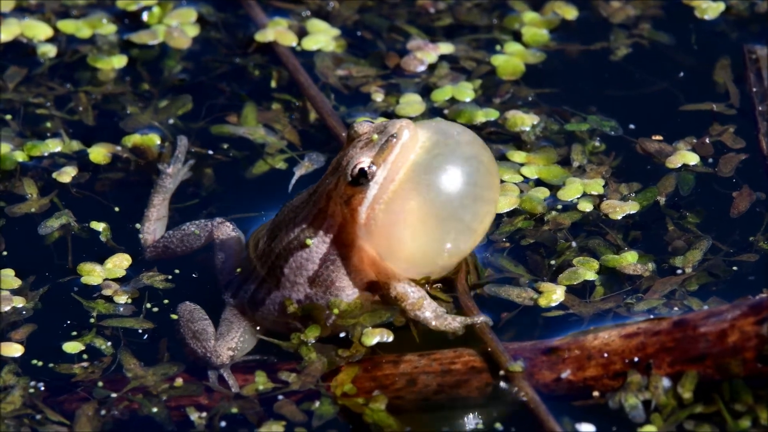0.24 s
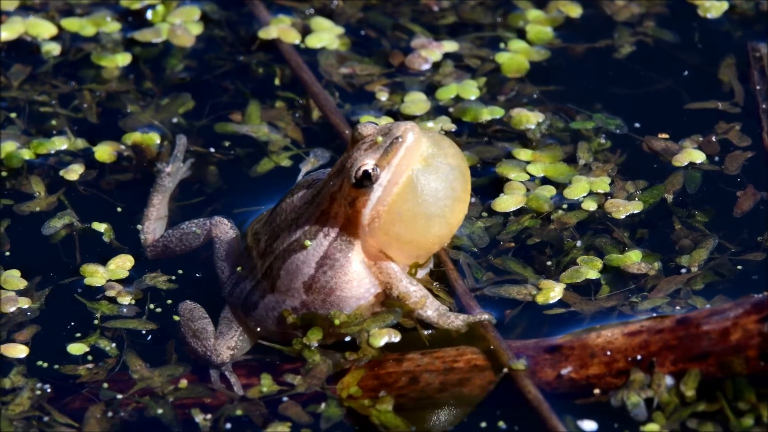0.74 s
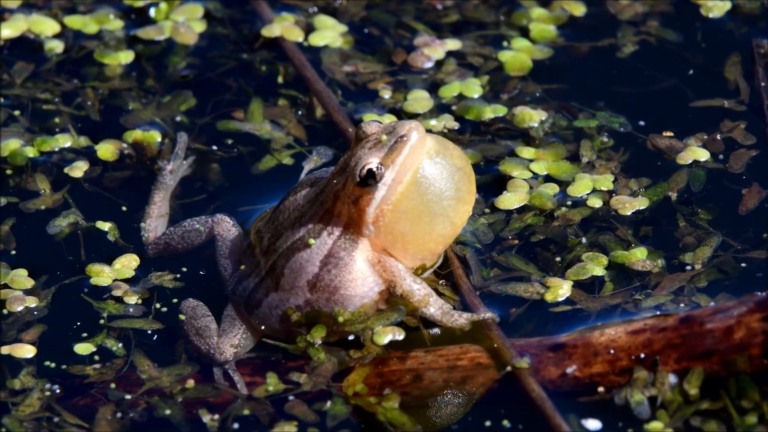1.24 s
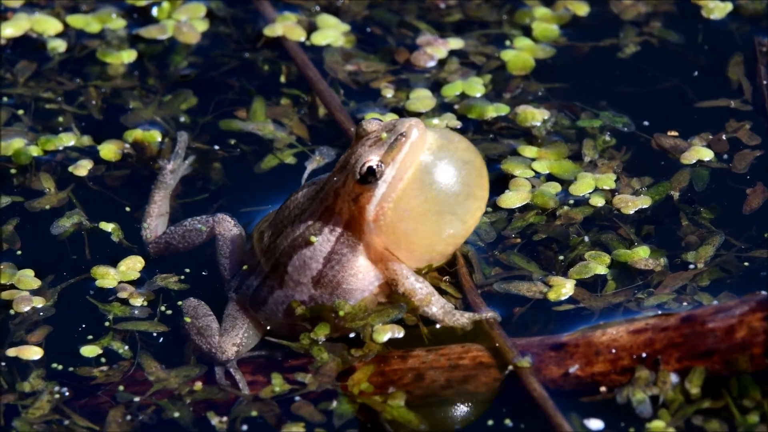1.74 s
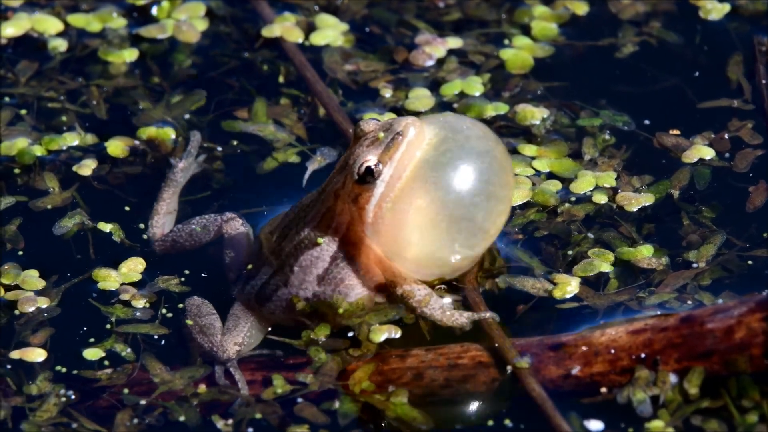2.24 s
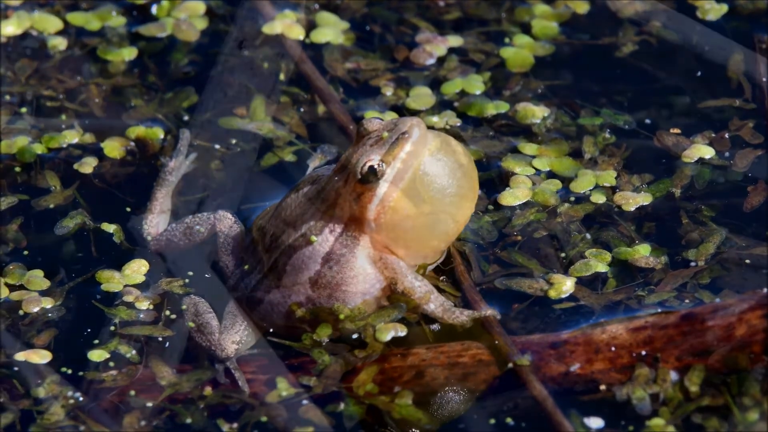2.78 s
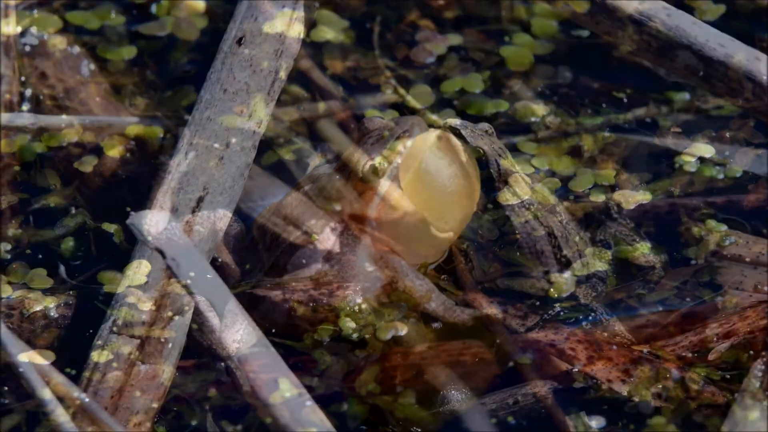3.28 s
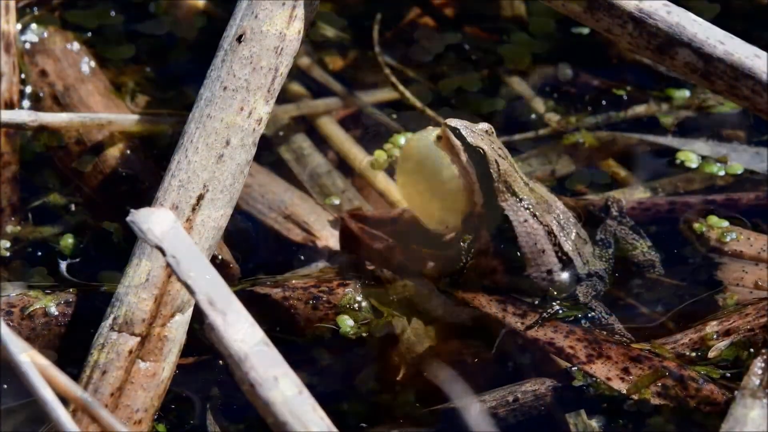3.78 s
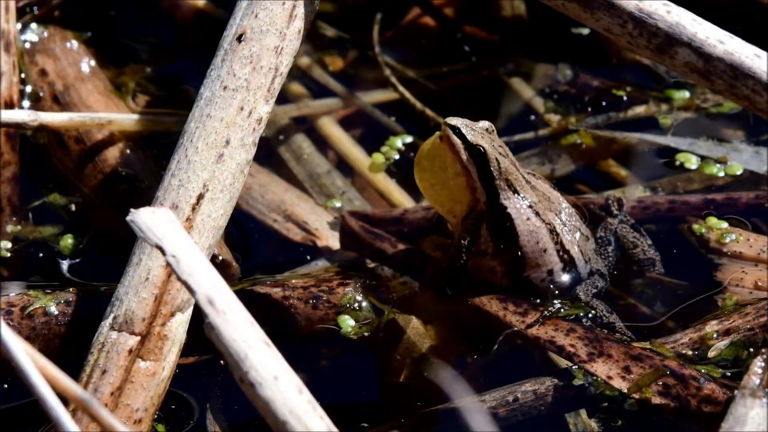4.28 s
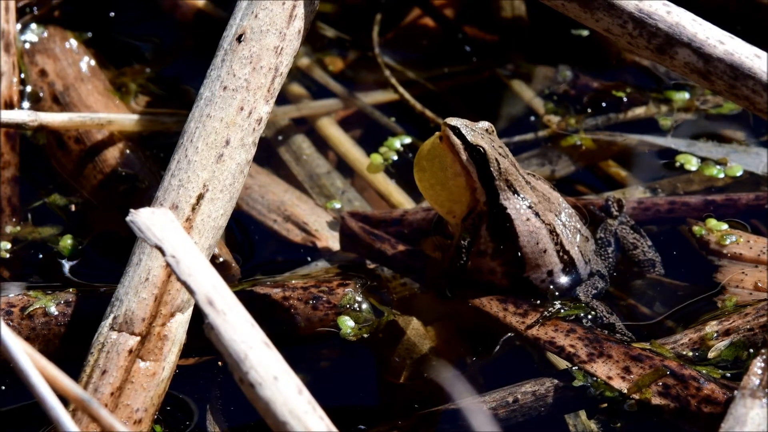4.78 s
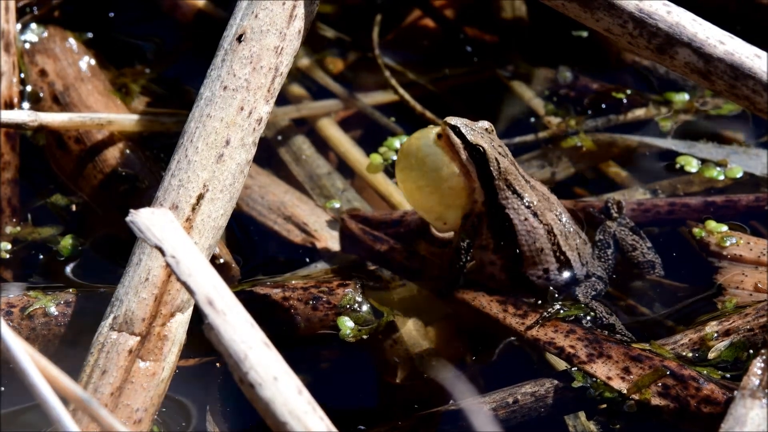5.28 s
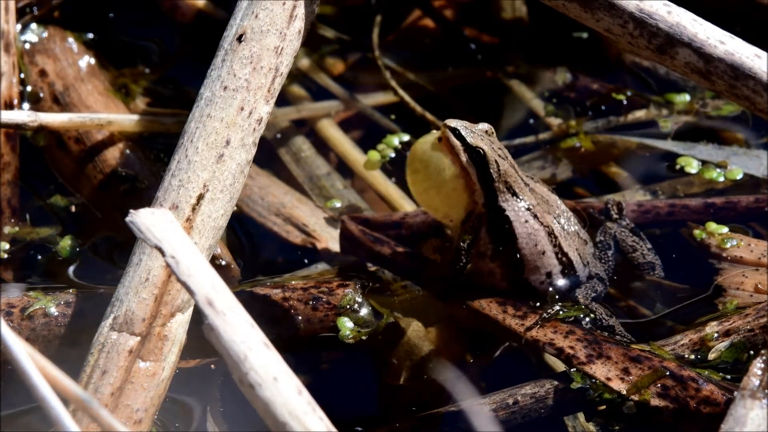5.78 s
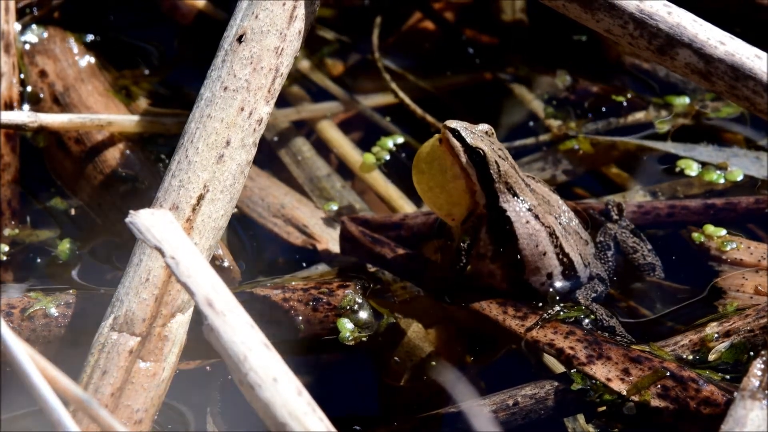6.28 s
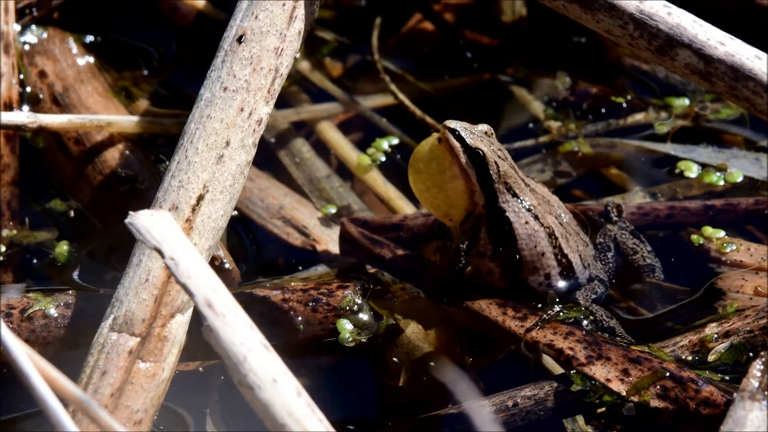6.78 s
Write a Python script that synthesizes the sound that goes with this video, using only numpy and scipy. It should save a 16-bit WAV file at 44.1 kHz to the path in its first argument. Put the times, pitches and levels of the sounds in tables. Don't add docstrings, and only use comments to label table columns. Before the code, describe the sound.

From 0 s a loud chorus of small frogs is already going at a shallow, reedy pond, and it continues unbroken to about 7 s. Each call lasts roughly 0.1 to 0.65 s: a string of hard, ringing ticks around 3 to 4 kHz, quick at first, then slower, longer and higher, like a comb being stroked. Near callers overlap on the left, ahead and on the right, with stray sharp ticks between. A smaller frog adds faint higher ticks near 0.5 and 2.4 s. Farther frogs form a blurred bed that dips around 2.4 s, swells from 2.75 to 4 s, thins, swells again near 5.3 s and drops near 5.9 s. The busiest, loudest clatter comes around 3.2 to 4.2 s. Reeds give short diffuse echoes. Far beneath are low rumble, soft wind puffs, thin hiss and a barely noticeable engine hum near 3.75 s. Peaks sound slightly compressed.

```python
import sys
import numpy as np
from scipy import signal
from scipy.fft import rfft, irfft, next_fast_len
from scipy.io import wavfile
from scipy.ndimage import uniform_filter1d, minimum_filter1d, map_coordinates

SR = 44100
rng = np.random.default_rng(int(sys.argv[2]) if len(sys.argv) > 2 else 0)


def store_pcm(level_fs):
    pcm = np.round(np.clip(level_fs, -1, 1) * 32767).astype(np.int16)
    wavfile.write(sys.argv[1], SR, np.atleast_2d(pcm).T)


def voltage_ratio(level):
    return 10 ** (np.asarray(level, float) / 20)


N = 310002


def unit(x):
    return x / np.sqrt(np.mean(x ** 2) + 1e-20)


def filtered(x, response):
    m = next_fast_len(N + SR // 2)
    spectrum = rfft(x, m) * response(np.fft.rfftfreq(m, 1 / SR))
    return irfft(spectrum, m)[..., :N]


def colour(points):
    f, db = np.transpose(points)
    return lambda hz: voltage_ratio(np.interp(np.log(hz + 1), np.log(f), db))


def curves(rows):
    s, *columns = np.transpose(rows)
    return [np.interp(np.arange(N) / SR, s, column) for column in columns]


def rush(spectrum, alike):
    mid, side = filtered(rng.standard_normal((2, N)), colour(spectrum))
    turn = np.arccos(np.clip(alike, 0, 1)) / 2
    return unit(np.cos(turn) * mid + np.sin(turn) * side * [[1], [-1]])


def place(shapes, s):
    first = np.clip(np.round((s - .0005) * SR).astype(int), 0, N)
    at = (first[:, None] + np.arange(shapes.shape[2])).ravel()
    return np.array([np.bincount(at, side.ravel(), N + SR)[:N] for side in shapes])


def trill(s, length, gap_ms, db, hz, side_db, ring_share):
    slowing_ms = 2.5
    shortest_gap_ms = 13.15
    rise_hz_per_tick = 42.6
    soft_start_db, swell_ticks, tiring_db = 4.5, 2.7, 3.5
    b = gap_ms - slowing_ms / 2
    gaps = max(2, round((np.sqrt(b * b + 2000 * slowing_ms * length) - b) / slowing_ms))
    slowing = 2 * (1000 * length - gaps * gap_ms) / (gaps * (gaps - 1))
    k = np.arange(gaps + 1)
    t = (k * gap_ms + slowing * k * (k - 1) / 2) / 1000
    gap_around_ms = gap_ms + slowing * (k - .5)
    ring_ms = np.maximum(3.2, ring_share * (gap_around_ms - shortest_gap_ms))
    level = db - soft_start_db * np.exp(-k / swell_ticks) - tiring_db * (k / gaps) ** 4
    pitch = hz + rise_hz_per_tick * (k - gaps / 2)
    return np.c_[s + t, level, pitch, ring_ms, side_db + 0 * t]


def voices(ticks, snap_db, scatter_db, path_us, rise_ms, throat_db):
    # (multiple of the sac pitch, level [dB], extra fall [dB per ms])
    partials = [(.45, -17, 5.5), (.51, -15, 4), (1, -0.5, 0.59), (1.5, -20, 2), (1.62, -20, 4),
                (2, -32, 1.5), (2.5, -42.5, 1.5), (3, -40.5, 2.5)]
    # (frequency [Hz], level [dB])
    snap_colour = [(600, -36.5), (1500, -16.5), (2400, -35), (3500, 10), (7000, -14), (15000, -24)]
    sag, sag_ms = 0.05, 0.92
    s, db, hz, ms, side_db = np.transpose(ticks)[:, :, None]
    luck = rng.standard_normal((len(ticks), 12))
    left_right = np.array([1, -1])[:, None, None]
    t = np.arange(800) / SR

    rise = rise_ms * voltage_ratio(-db / 2)
    opening = np.sin(np.minimum(1000 * t / rise, 1) * np.pi / 2) ** 2
    shut = np.clip((1.48 * ms - 1000 * t) / (0.57 * ms), 0, 1)
    gate = opening * np.sin(shut * np.pi / 2) ** 2

    ears = t + 1e-6 * (12 + path_us * luck[:, :1]) * left_right
    settling = sag * sag_ms / 1000 * np.exp(-1000 * t / sag_ms)
    turns = hz * (ears - settling) * (1 + 0.0034 * luck[:, 1:2])

    small_db = 6.5 * np.maximum(0, hz / 3700 - 1) * 10
    ring = 0
    for i, (k, level, fall) in enumerate(partials):
        if k < 1:
            level = level + throat_db + small_db
            fall = fall * (1 - 0.082 * throat_db)
        uneven_db = scatter_db * abs(np.log2(k)) * luck[:, 2 + i:3 + i]
        strength = voltage_ratio(level - fall * 1000 * t + uneven_db)
        ring = ring + strength * np.sin(2 * np.pi * k * turns + i * luck[:, 10:11])

    size = voltage_ratio(db + side_db / 2 * left_right)
    snap = rng.standard_normal((len(ticks), len(t))) + 1.13 * rng.standard_normal(ring.shape)
    snap = size * voltage_ratio(snap_db + 0.4 * luck[:, 11:] - 60 * t / 0.0053) * snap

    small_body = lambda f: 1 / (1 + (950 / (f + 1)) ** 6)
    rings = filtered(place(size * gate * ring, s[:, 0]), small_body)
    return rings + filtered(place(snap, s[:, 0]), colour(snap_colour))


def near_frogs():
    # (first tick [s], length [s], first gap [ms], peak level [dB], mean pitch [Hz])
    left_trills = [(0.5171, 0.3681, 35.4, -9.8, 3465), (0.5729, 0.2255, 37.8, -10.3, 3445),
                   (0.9738, 0.2893, 38.97, -5.1, 3525), (1.4143, 0.3058, 28.46, -8.8, 3445),
                   (1.5993, 0.2443, 46.7, -5.4, 3485), (1.8843, 0.2387, 31.77, -11.6, 3515),
                   (2.1098, 0.3445, 56.28, -9.3, 3625), (2.2207, 0.5951, 35.49, -14.2, 3305),
                   (2.4147, 0.2763, 23.82, -7.1, 3355), (3.4012, 0.1543, 34.0, -6.3, 3015),
                   (4.1715, 0.6004, 28.04, -3.4, 3145), (5.1302, 0.4205, 43.12, -8.5, 3415),
                   (5.6459, 0.3563, 32.33, -7.3, 3245), (5.9224, 0.6556, 27.2, -3.2, 3185),
                   (5.928, 0.4413, 30.55, -4.8, 3315), (6.2569, 0.3378, 41.21, -10.5, 3435),
                   (6.4626, 0.2594, 26.6, -5.7, 3275)]
    middle_trills = [(0.1097, 0.4459, 27.35, -4.2, 3215), (0.807, 0.4396, 33.2, -10.2, 3325),
                     (1.0271, 0.2557, 45.7, -9.1, 3335), (2.7652, 0.3357, 25.92, -6.1, 3215),
                     (2.8791, 0.4922, 33.88, -6.2, 3355), (3.5361, 0.155, 49.0, -5.6, 3585),
                     (3.7008, 0.1992, 35.7, -1.9, 3175), (3.84, 0.272, 52.4, -1.0, 3395),
                     (4.0841, 0.4949, 31.76, -6.3, 3305), (4.8438, 0.2301, 30.12, -4.6, 3235),
                     (5.2704, 0.332, 24.39, -7.2, 3065), (6.064, 0.1225, 63.85, 0.3, 3635),
                     (6.5767, 0.3202, 33.34, -7.1, 3175)]
    right_trills = [(0.4799, 0.2026, 45.22, -9.5, 3675), (0.6852, 0.2923, 23.14, -4.8, 3105),
                    (1.036, 0.1042, 52.25, -0.8, 3445), (1.3606, 0.1927, 35.4, -8.4, 3115),
                    (1.8677, 0.4103, 30.6, -4.5, 3195), (1.9573, 0.2862, 31.21, -8.1, 3395),
                    (2.1915, 0.1542, 42.83, -2.4, 3475), (2.4824, 0.2153, 23.03, -4.4, 2975),
                    (3.1833, 0.2299, 32.77, -5.6, 3365), (3.4682, 0.3381, 55.33, -3.2, 3525),
                    (4.8294, 0.5602, 32.13, -6.4, 3415), (5.1077, 0.1062, 51.5, -1.9, 3515),
                    (5.663, 0.102, 55.25, -1.4, 3475)]
    bank_sides = [5.5, 0.4, -3.5]
    # (time [s], peak level [dB], sac pitch [Hz], length [ms])
    left_ticks = [(0.5234, -15, 4080, 6.5), (0.5794, -11.5, 3150, 14), (0.9038, -11, 3380, 7),
                  (1.1742, -13.5, 3330, 5.5), (1.2916, -6, 3310, 2.7), (1.6597, -10.5, 3580, 5.6),
                  (2.092, -9.5, 3100, 4.1), (2.67, -11, 3310, 2.6), (2.675, -6.5, 3520, 16),
                  (2.744, -11.5, 3910, 1.3), (2.8335, -4, 3360, 2), (3.394, -4, 3450, 3.3),
                  (3.4551, -5.5, 3590, 13), (3.4592, -0.5, 3460, 2.5), (3.6577, -10, 3510, 21),
                  (3.8233, -11, 3380, 4.7), (3.982, -11.5, 3820, 6.7), (4.1428, 0, 3380, 1.3),
                  (4.2705, -2, 3540, 2.4), (4.3244, -4.5, 3380, 1.3), (4.44, -10.5, 3935, 11),
                  (4.6554, -4, 3330, 2.2), (4.966, -5, 3920, 6.6), (5.0468, -11, 3330, 20),
                  (5.1058, -14.5, 3535, 21), (5.2556, -12.5, 3480, 8.6), (5.8935, -9, 2900, 5.5),
                  (6.214, -13.5, 3890, 14), (6.4814, -8.5, 3480, 7.8), (6.9523, -5, 3160, 4.5)]
    middle_ticks = [(0.0027, -11, 3770, 13), (0.0271, -6, 3440, 3.3), (0.0885, -8, 3270, 5.2),
                    (0.1117, -13, 3950, 11), (0.139, -11.5, 3840, 8.6), (1.633, -9.5, 3600, 3.4),
                    (1.782, -10.5, 3840, 7.3), (1.842, 1.5, 3360, 1.3), (1.8907, -8, 3860, 5.6),
                    (2.6991, -3, 3230, 11), (2.9917, -9.5, 3980, 8.3), (3.1753, -5, 3390, 1.1),
                    (3.2371, -20.5, 3480, 3.9), (3.2692, -3, 3600, 3.1), (3.309, -21, 3220, 12),
                    (3.6047, 1, 3444, 3.4), (3.7152, -3, 3130, 3.3), (3.7707, -2, 3390, 11),
                    (4.034, -5.5, 3690, 6.3), (4.0594, -12.5, 4020, 9), (4.2676, -14.5, 2760, 6.5),
                    (5.1965, -7.5, 3310, 3.1), (6.4388, -3.5, 3510, 7.8), (6.507, -14, 3540, 2.9),
                    (6.778, -5, 3280, 5.2), (6.837, -6, 3430, 24), (6.9449, -3, 3630, 3.5)]
    right_ticks = [(0.0606, -7, 3560, 10), (0.4546, -19, 3170, 15), (0.6165, -4.5, 3420, 7.7),
                   (1.1679, -4, 3700, 3.3), (1.752, -7.5, 3620, 1.4), (1.963, -9, 3490, 5.4),
                   (2.2812, -9.5, 3650, 4.9), (2.736, -6.5, 3264, 5.4), (2.846, -8, 2980, 3.4),
                   (2.8966, -4.5, 3730, 4.3), (2.9243, -28, 3340, 6), (2.951, 0, 3580, 2.8),
                   (3.151, -2, 3380, 3.6), (3.246, -7.5, 3020, 6.1), (3.3887, -0.5, 3600, 5.9),
                   (3.4247, -4.5, 3330, 3.1), (3.4784, 2, 3600, 5.7), (3.5095, -11.5, 3940, 19),
                   (3.6594, -2.5, 3280, 4.8), (3.8195, 3, 3560, 2.6), (4.619, -4, 3580, 6.7),
                   (5.021, -9, 3420, 6.4), (5.4175, -3, 3720, 3.9), (6.225, -6.5, 3840, 3.2),
                   (7.0085, -1, 3380, 5)]
    # (time [s], peak level [dB], sac pitch [Hz], length [ms])
    small_frog = [
        (0.457, -8, 3800, 4),
        (0.585, -15, 4200, 2.9),
        (0.626, -18.5, 4560, 3.1),
        (2.399, -11, 4060, 1.6),
        (2.509, -17.5, 4490, 6.7),
    ]
    clear = []
    for rows, side_db in zip((left_trills, middle_trills, right_trills), bank_sides):
        for row in rows:
            clear.append(trill(*row, side_db, ring_share=0.2))
    clear = np.vstack(clear)
    clear[:, 3] *= np.exp(0.056 * rng.standard_normal(len(clear)))
    hidden = []
    for ticks, side_db in ((left_ticks, 7.5), (middle_ticks, 2.4), (small_frog, 2.4), (right_ticks, -3.5)):
        hidden.append(np.c_[ticks, np.full(len(ticks), side_db)])
    return voices(np.vstack([clear] + hidden), snap_db=-12.5, scatter_db=3.5, path_us=5.7,
                  rise_ms=0.53, throat_db=0.5)


def far_frogs(count=8):
    waves = [-.45, .06, .66, 1.24, 1.8, 2.42, 2.75, 3.1, 3.4, 3.72, 4.16, 4.62, 5.24, 5.62, 5.9, 6.45]
    # (time [s], level [dB])
    far_level = [
        (0, -16.5),
        (1.2, -17.5),
        (1.5, -17),
        (2.4, -19.5),
        (2.75, -13),
        (4.05, -16),
        (4.2, -21.5),
        (5.3, -13),
        (5.9, -23),
        (7.03, -17),
    ]
    starts = np.repeat(waves, count)
    luck = rng.standard_normal((len(starts), 5))
    luck[:, 0] = np.tile(np.linspace(-.1, .22, count), len(waves)) + .03 * luck[:, 0]
    calls = []
    for s, (late, pace, size, pitch, side) in zip(starts, luck):
        hz = 3300 + 60 * pitch + 45 * pitch ** 2
        calls.append(trill(s + late, .63 + .044 * pace, 28 + 2 * pace, 2.38 * size, hz,
                           side_db=1.5 + 8.2 * side, ring_share=0.14))
    calls = np.vstack(calls)
    calls = calls[(calls[:, 0] > 0) & (calls[:, 0] < N / SR)]
    chorus = voices(calls, snap_db=-15, scatter_db=4.5, path_us=15.3, rise_ms=2.33, throat_db=3.5)
    return voltage_ratio(curves(far_level)[0]) * unit(chorus)


def reeds(x, t60):
    t = np.arange(SR // 4) / SR
    tail = rng.standard_normal((2, len(t))) * voltage_ratio(-60 * t / t60) * (t > .003)
    return signal.fftconvolve(x, tail / np.linalg.norm(tail[0]), axes=1)[:, :N]


def country_rumble(level_db):
    # (frequency [Hz], level [dB per Hz])
    rumble_colour = [(50, -9.5), (190, 2), (400, 6), (900, 0.5), (1600, -22.5)]
    return voltage_ratio(level_db) * rush(rumble_colour, alike=0.57)


def wind(level_db, gusts):
    flutter = rush([(15, 12.0), (30, -15), (90, 2.0), (200, -29.0)], alike=0.19)
    return voltage_ratio(level_db + 1.0 + 2.9 * gusts) * flutter


def engine_hum(gusts):
    # (time [s], level [dB])
    hum_level = [
        (3, -67.5),
        (3.75, -48),
        (4.13, -53),
        (4.2, -85),
    ]
    hum = rush([(165, -32.5), (190, 7.5), (208, 1), (240, -34.5)], alike=0.94)
    return voltage_ratio(curves(hum_level)[0] + 1.4 * gusts) * hum


def air_hiss():
    # (frequency [Hz], level [dB per Hz])
    hiss_colour = [(900, -9.5), (2400, -4), (15500, -41.5)]
    return voltage_ratio(-43) * rush(hiss_colour, alike=0.6)


def background():
    # (time [s], rumble level [dB], wind level [dB])
    low_levels = [(0, -48.5, -67), (0.7, -51, -70), (0.78, -51, -62.5), (0.98, -50, -68),
                  (2.53, -48.5, -69), (2.64, -44, -60), (4.12, -42.5, -65), (4.2, -50.5, -66.5),
                  (4.84, -52, -70.5), (4.95, -51.5, -60.5), (5.44, -50.5, -58), (5.6, -53.5, -69.5),
                  (6.55, -51.5, -65.5), (7.03, -52, -54)]
    rumble_db, wind_db = curves(low_levels)
    gusts = map_coordinates(rng.standard_normal(80), [np.arange(N) * 8 / SR])
    return country_rumble(rumble_db) + wind(wind_db, gusts) + engine_hum(gusts) + air_hiss()


def scene():
    near, far = near_frogs(), far_frogs()
    echoes = reeds(voltage_ratio(-31.5) * near + voltage_ratio(-10.5) * far, t60=0.36)
    return near + far + echoes + background()


def top_cut(x):
    return signal.sosfilt(signal.butter(12, 15670, fs=SR, output="sos"), x)


def record(dry):
    top_hz = 15700
    need = np.minimum(1, (0.84 / (np.abs(dry).max(0) + 1e-9)) ** 0.58)
    gain = uniform_filter1d(minimum_filter1d(need, size=61), size=61)
    banded = filtered(dry * gain, lambda hz: hz < top_hz)
    mix = np.clip(voltage_ratio(0.51) * banded, -1, 1)
    return top_cut(mix)


dry = scene()
out = record(dry)
store_pcm(out)
```